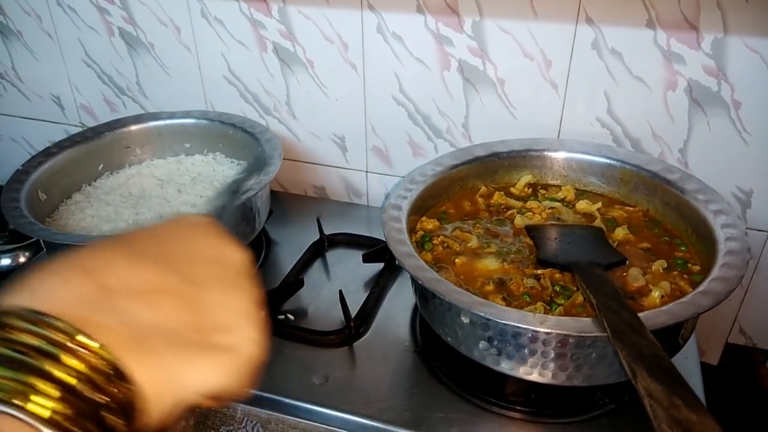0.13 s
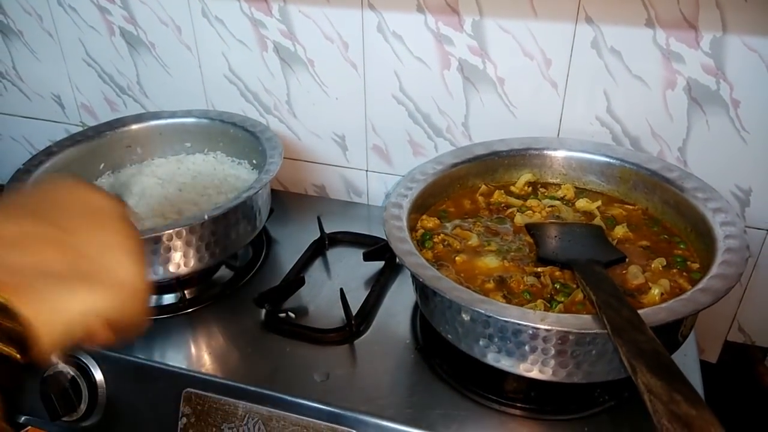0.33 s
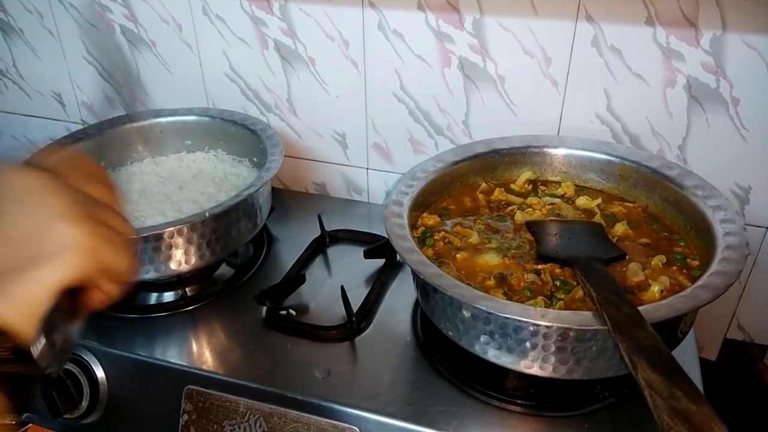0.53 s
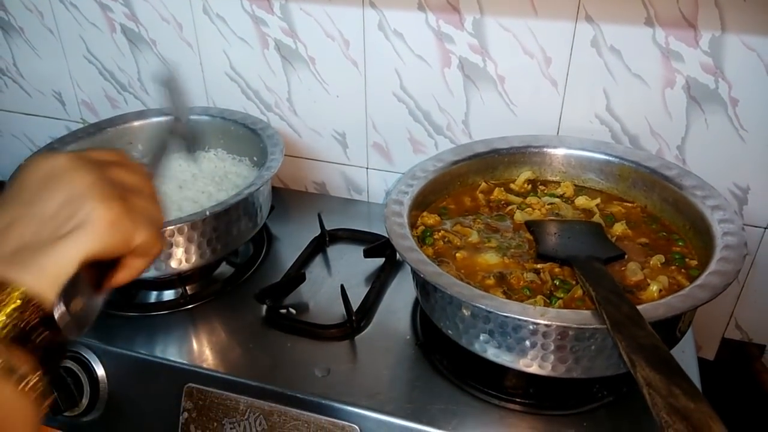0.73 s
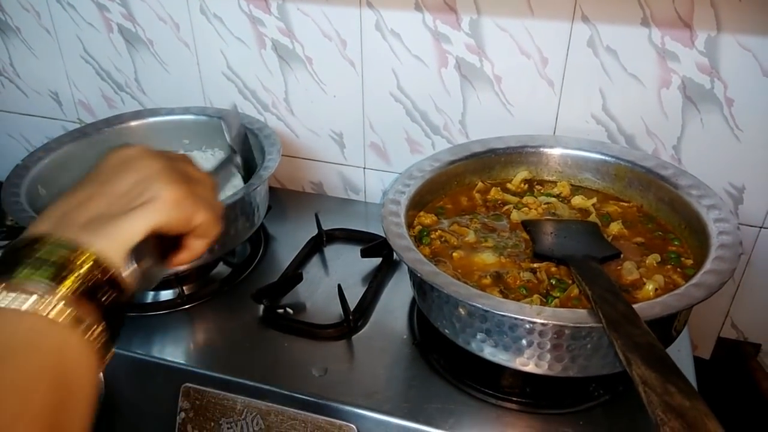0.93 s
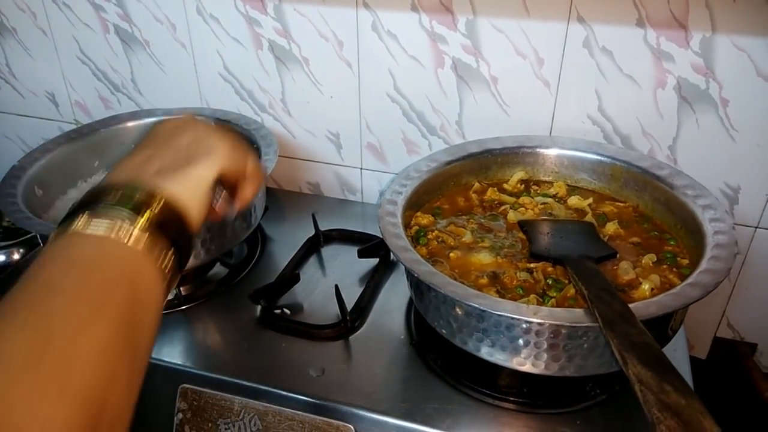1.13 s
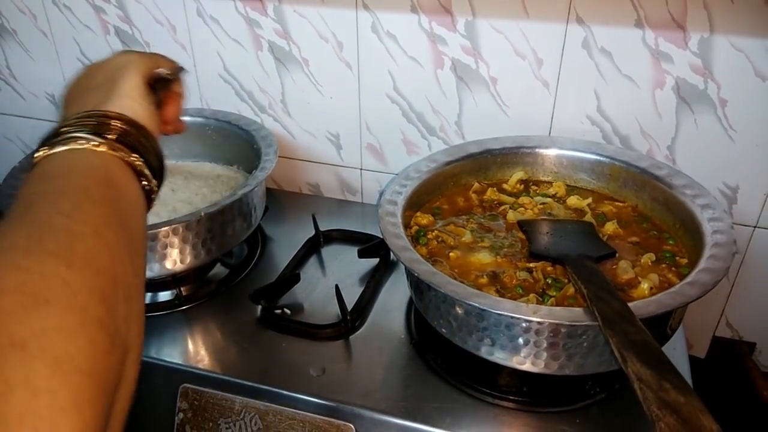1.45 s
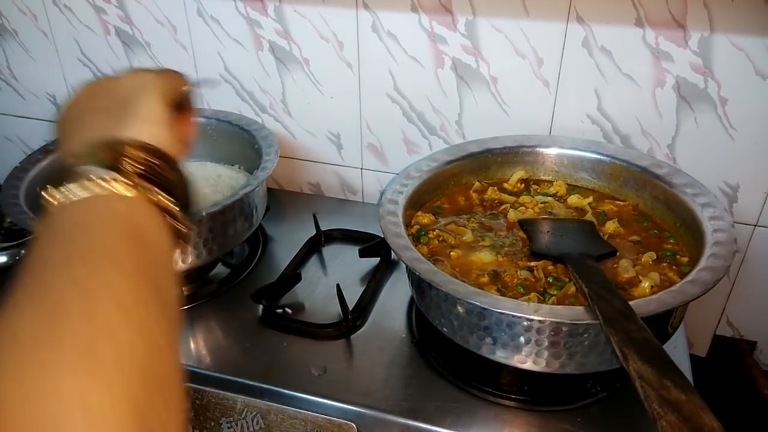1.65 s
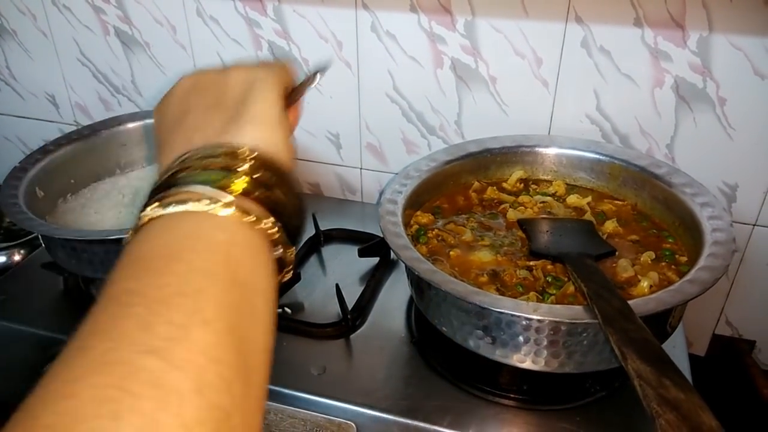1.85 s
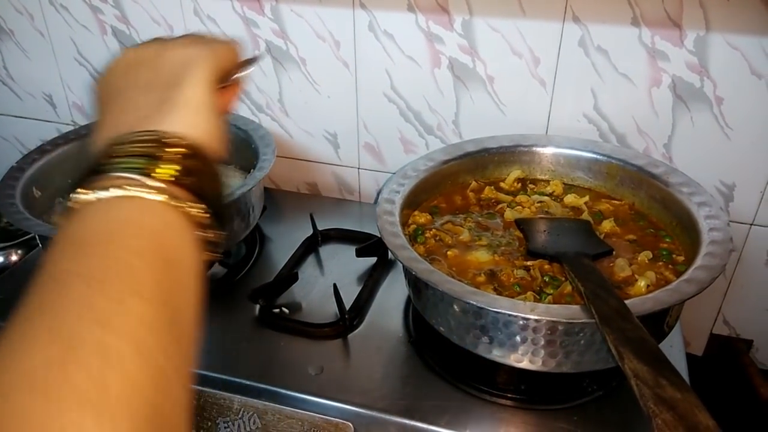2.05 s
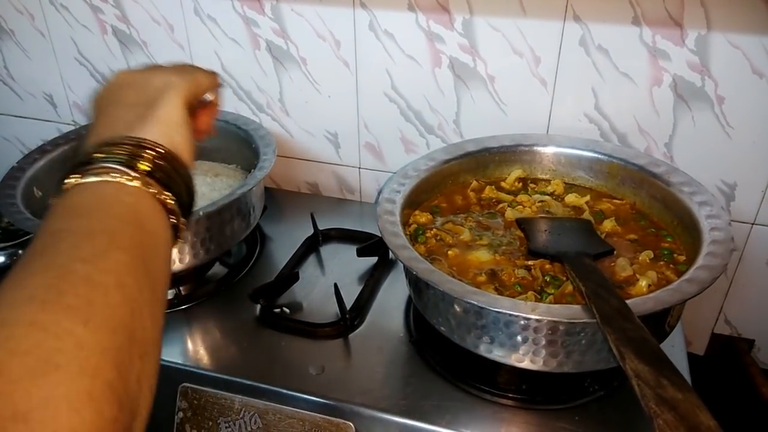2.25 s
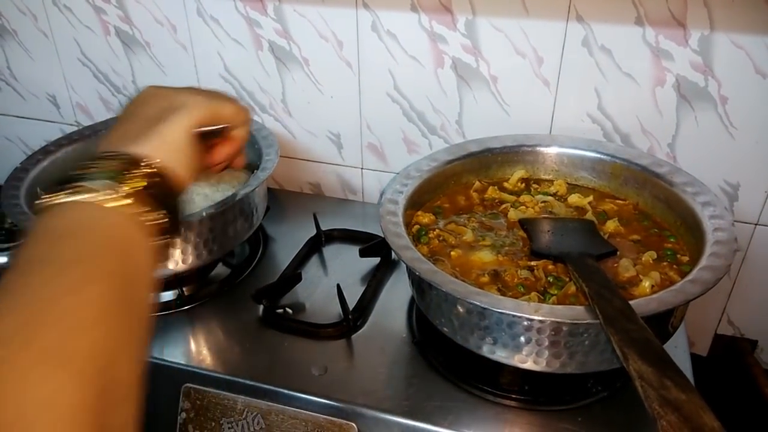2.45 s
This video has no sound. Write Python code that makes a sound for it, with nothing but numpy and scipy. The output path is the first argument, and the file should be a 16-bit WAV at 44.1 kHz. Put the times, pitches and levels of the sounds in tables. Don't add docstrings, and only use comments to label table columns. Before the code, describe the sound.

A metal spoon knocks and scrapes against a thin steel pot of rice in a tiled kitchen.

```python
import sys
import numpy as np
from scipy import signal
from scipy.fft import rfft, irfft
from scipy.io import wavfile
from scipy.ndimage import uniform_filter1d, minimum_filter1d

SR = 44100
rng = np.random.default_rng(int(sys.argv[2]) if len(sys.argv) > 2 else 0)


def materialize(psi):
    bounded = np.clip(np.atleast_2d(psi).T, -1, 1)
    quanta = np.round(bounded * 32767).astype(np.int16)
    wavfile.write(sys.argv[1], SR, quanta)


def nominal_scale(level):
    x = np.asarray(level, float) / 20
    return 10 ** x


N = 114660


def evened(x):
    return x / np.sqrt(np.mean(x ** 2) + 1e-20)


def read(points, hz):
    f, value = np.transpose(points)
    return np.interp(np.log(hz + 1), np.log(f + 1), value)


def band(x, order, lo_hz, hi_hz):
    return signal.sosfilt(signal.butter(order, [lo_hz, hi_hz], "band", fs=SR, output="sos"), x)


def alike(draw, same):
    return np.array([same * draw[1] + np.sqrt(1 - same ** 2) * draw[0], draw[1]])


def modes(table, flip=1, spread=0.6):
    t = np.arange(SR // 3) / SR
    hz, db, t60 = np.transpose(table)[..., None, None]
    phase = spread * rng.standard_normal(hz.shape) * [[1], [0]]
    sign = flip ** np.arange(len(table))[:, None, None]
    out = sign * nominal_scale(db - 60 * t / t60) * np.sin(2 * np.pi * hz * t + phase)
    return out / np.linalg.norm(out[:, 1])


def tail(t60s, colour, lo_hz, hi_hz, same):
    noise = alike(rng.standard_normal((2, SR // 2)), same)
    hz, t, z = signal.stft(noise, SR, nperseg=128)
    z = z * nominal_scale(read(colour, hz)[:, None] - 60 * t / read(t60s, hz)[:, None])
    out = band(signal.istft(z, SR, nperseg=128)[1], 2, lo_hz, hi_hz)
    return out / np.linalg.norm(out[1])


def through(drive, ring):
    return signal.fftconvolve(np.atleast_2d(drive), ring, axes=1)[:, :N]


def lean(x, table):
    lag_samples, lag_from_hz = 12, 2040
    hz = np.fft.rfftfreq(N, 1 / SR)
    z = rfft(x) * nominal_scale(np.outer([.5, -.5], read(table, hz)))
    lag_s = lag_samples / SR / (1 + (lag_from_hz / (hz + 1)) ** 4)
    z[0] *= np.exp(-2j * np.pi * hz * lag_s)
    return irfft(z, N)


# frequency in Hz, density in dB per Hz.
HISS = [(24, -81), (60, -31), (120, -4), (249, -2), (896, -8.5), (1090, -12), (2050, -5.5), (2440, -7.5),
        (11000, -6.5), (16000, -30)]
# frequency in Hz, left minus right in dB.
HISS_LEAN = [(200, -2), (900, 4), (2400, -23), (8000, -17.5), (15000, -30)]
# frequency in Hz, left-right likeness from 0 to 1.
HISS_SAME = [(200, 1), (1400, 0.34), (6000, 0)]
# time in seconds, level in dB.
FLAME = [
    (0.0, -50),
    (1.0, -54.5),
    (2.6, -51.5),
]


def stove():
    level_db, patch_db = -57.5, 2.2
    frames, hz = N // 128 + 5, np.fft.rfftfreq(512, 1 / SR)
    a, b, c, d, patches = rng.standard_normal((frames, 257, 5)).T
    patches = evened(uniform_filter1d(uniform_filter1d(patches, 6, 0), 20, 1))
    z = alike([c + 1j * d, a + 1j * b], read(HISS_SAME, hz)[:, None])[::-1]
    s, db = np.transpose(FLAME)
    swell = np.interp(np.arange(frames) * 128 / SR, s, db - db.mean())
    z = z * nominal_scale(read(HISS, hz)[:, None] + patch_db * patches + 0.23 * swell)
    out = lean(signal.istft(z, nperseg=512, noverlap=384)[1][:, :N], HISS_LEAN)
    return nominal_scale(level_db) * out / np.std(out.mean(0))


# frequency in Hz, t60 in seconds.
ROOM = [(300, 0.22), (2000, 0.28), (6000, 0.23), (14000, 0.067)]


def tile_echo(near):
    room = tail(ROOM, [(100, -1.5), (16000, -9.5)], 120, 13000, 0.078)
    return nominal_scale(-6) * through(near[1], np.pad(room, ((0, 0), (200, 0))))


# frequency in Hz, density in dB per Hz.
GRIT = [(88, -66.5), (150, -32.5), (1260, -13.5), (1480, -20), (2180, -8.5), (2400, -12.5), (4240, -19),
        (10200, -26.5), (16000, -31)]
# frequency in Hz, t60 in seconds.
GRIT_T60 = [(300, 0.083), (3000, 0.13), (14000, 0.021)]


def grit(lo_hz, hi_hz, same):
    return tail(GRIT_T60, GRIT, lo_hz, hi_hz, same)


# start in seconds, level in dB.
BANGLES = [
    (0.05, -55),
    (0.153, -46),
    (0.1643, -49.5),
    (0.1716, -55),
]
# frequency in Hz, level in dB, t60 in seconds.
GLASS = [(9060, 25, 0.045), (10700, -5, 0.023), (12400, 4, 0.037), (14100, -6, .02)]
# frequency in Hz, level in dB, t60 in seconds.
OLD_RING = (994, -63.5, 0.55)


def bangles():
    drive, t = np.zeros(N), np.arange(N) / SR
    for s, db in BANGLES:
        drive[round(s * SR):][:60] += nominal_scale(db + 6.5) * rng.standard_normal(60)
    glass = modes(GLASS).sum(0) + 0.95 * grit(10600, 14700, 0.54)[:, :SR // 3]
    hz, db, t60 = OLD_RING
    fading = nominal_scale(db - 60 * t / t60) * rng.standard_normal(N)
    old = through(fading, modes([(hz, 0, .05), (hz * 0.934, -6, .05)]).sum(0))
    return through(drive, glass) + old


# start in seconds, length in seconds, frequency in Hz,
# glide in Hz, level in dB.
GROANS = [(.49, 0.069, 239, -8, -52.5), (0.493, 0.052, 387, -17, -57), (0.498, 0.034, 2392, 3, -34.5),
          (0.719, 0.052, 833, 0, -40), (0.761, .1, 405.5, 56, -52), (0.859, 0.13, 440.3, -50, -48),
          (0.786, 0.0464, 3653, 3, -37), (.77, 0.09, 1060, -7, -46), (.89, 0.11, 790, -8, -42),
          (.9, 0.045, 1780, -11, -37.5), (0.946, 0.13, 305, 30, -51.5), (.96, 0.045, 178, 0, -59),
          (.95, 0.053, 504.6, 0, -50), (1.001, 0.058, 630, 2, -45), (1.062, 0.064, 765, 1.5, -47.5),
          (1.33, 0.024, 508, 0, -39.5), (1.374, 0.09, 463.3, -13, -52.5), (2.266, 0.032, 8400, 6.5, -37.5),
          (2.28, .05, 9670, 0, -35.5), (2.35, 0.033, 9950, 2, -45.5), (2.278, 0.041, 700, 9, -51.5)]


def groans():
    out = np.zeros(N)
    for s, length, hz, glide_hz, db in GROANS:
        noise, n = rng.standard_normal((2, SR // 4)), round(length * SR)
        width_hz = 30.5 + 0.017 * hz
        lowpass = signal.butter(2, width_hz / 2, fs=SR, output="sos")
        slow = signal.sosfilt(lowpass, 0.011 + noise[0] + 1j * noise[1])[-n:]
        phase = 2 * np.pi * np.cumsum(hz + glide_hz * np.linspace(-.5, .5, n)) / SR
        squeak = evened((slow * np.exp(1j * phase)).real) * np.hanning(n) ** .5
        out[round(s * SR):][:n] += nominal_scale(db) * squeak
    return out


# start in seconds, level in dB.
PUFFS = [
    (0.491, -75),
    (.6, -72),
    (0.959, -74),
    (1.325, -65.5),
    (1.946, -70.5),
    (2.031, -67),
    (2.075, -68),
    (2.131, -65),
]


def jolts():
    out, t = np.zeros(N), np.arange(SR // 8) / SR
    jolt = np.sin(2 * np.pi * 35 * t) * np.exp(-t / .02)
    for s, db in PUFFS:
        out[round(s * SR):][:len(t)] += nominal_scale(db + 18) * jolt
    return out


# start in seconds, then levels of wall, pair, spoon and belly in dB.
KNOCKS = [(0.4858, -25, -32.5, -22, -80), (0.5996, -24, -35, -27, -88), (0.6988, -28, -27.5, -43, -81),
          (0.7258, -36.5, -62, -33.5, -61), (0.7876, -30.5, -49, -30, -64), (0.957, -35.5, -22.5, -22, -51),
          (1.1877, -39.5, -36, -38.5, -58.5), (1.2336, -46.5, -39.5, -39.5, -60),
          (1.2513, -34, -30.5, -38, -56), (1.3219, -15, -14, -26.5, -31.5), (1.3326, -18, -29, -35.5, -56),
          (1.9419, -22.5, -12, -18.5, -23), (2.0306, -35.5, -18.5, -28.5, -27),
          (2.0536, -29, -17, -36.5, -24.5), (2.0731, -33, -24, -29, -39), (2.1244, -17, -47, -34, -34),
          (2.1314, -13, -17, -22.5, -27), (2.2471, -32, -60, -34, -51), (2.277, -53.5, -61, -35, -65.5)]


def knocks(column, shape, spot_db=0):
    out, spot = np.zeros((2, N)), nominal_scale(spot_db * rng.standard_normal(60))
    for k, row in enumerate(KNOCKS):
        at = round(row[0] * SR)
        contact = shape[:, k] / np.linalg.norm(shape[1, k])
        out[:, at:at + shape.shape[2]] += spot[k] * nominal_scale(row[column]) * contact
    return out


def thud(chatter):
    return band(nominal_scale(20.5) * knocks(4, chatter), 2, 150, 300)


# time in seconds, pressure in dB, speed in dB, grip on the wall in dB.
STROKES = [
    [(.61, -44, 8.5, -2), (.68, -41, 5, -5), (.74, -33.5, -9.5, -1.5), (.775, -54, 31, 30)],
    [(.79, -29, -6, -33), (.9, -32, -3, -18.5), (.965, -30.5, 3.5, 4), (1.04, -35.5, 3, -6.5),
     (1.11, -47.5, 1.5, 7), (1.18, -42, 2.5, 7.5), (1.24, -42.5, 5.5, 11), (1.305, -63.5, 16, 19)],
    [(1.35, -46.5, -16.5, -2), (1.41, -37.5, -4.5, 6), (1.46, -57.5, 4, -5)],
    [(1.97, -36.5, -7, 13.5), (2.06, -47, 10.5, 10.5), (2.12, -58.5, 5, 7)],
    [(2.16, -30, -4, 5), (2.22, -43.5, 2, -30), (2.28, -40.5, 10, -14), (2.35, -40.5, 4.5, -18),
     (2.385, -76, 22, 15)],
]


def stroke(weights):
    lift_s = 0.0061
    t, power = np.arange(N) / SR, np.zeros(N)
    for rows in STROKES:
        s, *controls = np.transpose(rows)
        ends = np.clip(np.minimum(t - s[0], s[-1] - t) / lift_s + .5, 0, 1)
        power += (ends ** .5 * nominal_scale(np.interp(t, s, np.dot(weights, controls)))) ** 2
    return np.sqrt(power)


def wander():
    depth_db, points_per_s = 6, 100
    steps = rng.standard_normal(round(N / SR * points_per_s) + 2)
    slow = evened(uniform_filter1d(steps, 4))
    return nominal_scale(depth_db * np.interp(np.arange(N) / SR * points_per_s, np.arange(len(slow)), slow))


CONTACT = {"pair": (2, (0.63, 0, 0.68)), "wall": (1, (0.89, 0, 0.25)),
           "spoon": (3, (0.97, 0.56, 0)), "belly": (4, (1, -0.38, 0.44))}
# frequency in Hz, level in dB, t60 in seconds.
PAIR = [(1487.1, 0, 0.081), (1505.2, 0.5, .08)]
WALL_HZ = [1572, 1904, 2427, 2460, 2956, 3274, 3342, 3414, 3644, 3745, 4060, 4545, 5110, 5600]
# level in dB, t60 in seconds.
WALL = [(-9, .08), (-8, .12), (-1, .16), (-6, .09), (-4, .15), (-8, .15), (-7, .17), (-6, .17), (-8, .13),
        (-10, .1), (-8, .15), (-5, .1), (-5, .1), (-9, .1)]
# frequency in Hz, level in dB, t60 in seconds.
SPOON = [(5850, -4, .05), (7380, -5, .05), (7810, -4, .05), (8400, -4, .05), (8900, -4, .04),
         (9930, -2, .04), (10900, -4, .04), (12050, -7, .04)]
# frequency in Hz, level in dB, t60 in seconds.
BELLY = [(552, 7, 0.054), (715, 4.5, 0.08), (780, 15.5, 0.037), (1060, 5.5, 0.03)]
RING_DB = (-1.5, -8, -11, -7)
SING_DB = (-17, -14, -22, -17)


def ringing(chatter, slips):
    rings = {"pair": modes(PAIR, -0.94, 0).sum(0)[None], "wall": modes(np.column_stack([WALL_HZ, WALL])),
             "spoon": modes(SPOON), "belly": modes(BELLY)}
    out = 0
    for (part, (column, weights)), ring_db, sing_db in zip(CONTACT.items(), RING_DB, SING_DB):
        shape, spot_db = (chatter[..., :1], 0) if part == "pair" else (chatter, 4)
        rub = nominal_scale(sing_db) * stroke(weights) * slips
        for ring in rings[part]:
            hit = 30 * nominal_scale(ring_db) * knocks(column, shape, spot_db)
            out = out + through(hit + rub * wander(), ring)
    return out


CRACK_DB = (-4.5, -8.5, 0.5)
RUB_DB = (-7, -7.5, -3)
# centre in Hz, width in Hz.
GAPS = [(2190, 250), (2720, 120), (4230, 300), (4880, 200), (6150, 150)]


def dense_modes(chatter, slips):
    bands = [("belly", 400, 1300), ("wall", 1300, 6000), ("spoon", 6000, 17000)]
    dense = 0
    for (part, lo_hz, hi_hz), crack_db, rub_db in zip(bands, CRACK_DB, RUB_DB):
        column, weights = CONTACT[part]
        crack = 20 * nominal_scale(crack_db) * knocks(column, chatter)
        rub = nominal_scale(rub_db) * stroke(weights) * slips
        dense = dense + through(crack + rub, grit(lo_hz, hi_hz, 0.27))
    for hz, width_hz in GAPS:
        notched = signal.lfilter(*signal.iirnotch(hz, hz / width_hz, SR), dense)
        dense = dense + 0.6 * (notched - dense)
    return dense


def pot():
    likeness, contact_s = 0.38, 0.0048
    slips_per_s, slip_db = 9000, 1.8
    decay = np.exp(-np.arange(400) / SR / contact_s)
    chatter = alike(rng.standard_normal((2, len(KNOCKS), 400)) * decay * 0.052, likeness)
    chatter[..., 0] = 0.44
    size = nominal_scale(slip_db * np.minimum(rng.exponential(1, N), 5)) * (rng.random(N) < slips_per_s / SR)
    slips = alike(evened((size + 0.069) * rng.standard_normal((2, N))), likeness)
    steel = ringing(chatter, slips) + dense_modes(chatter, slips)
    steel = signal.sosfilt(signal.butter(3, 450, "high", fs=SR, output="sos"), steel)
    return steel + groans() + jolts() + thud(chatter)


# frequency in Hz, left minus right in dB.
LEAN = [(200, -3.5), (600, 1.5), (1500, -4), (4400, 0.5), (9500, -11.5), (14000, -9.5)]


def scene():
    near = pot() + bangles()
    return lean(near + tile_echo(near), LEAN) + stove()


def band_limit(x):
    return signal.sosfilt(signal.butter(12, 16800, fs=SR, output="sos"), x)


def record(dry):
    gate_db, shut_db = -4, -22
    cut = signal.sosfilt(signal.butter(1, 80, "high", fs=SR, output="sos"), dry)
    cut = signal.sosfilt(signal.cheby2(8, 30, 16400, fs=SR, output="sos"), cut)
    hz, _, z = signal.stft(cut, SR, nperseg=2048, noverlap=1536)
    raw = (abs(z) ** 2).sum(0)
    power, treble = uniform_filter1d(raw, size=5, axis=1), raw[hz > 3000].sum(0)
    calm = minimum_filter1d(treble < 3 * np.roll(treble, 2), size=3)
    around = uniform_filter1d(power, size=50, axis=0)
    under = uniform_filter1d(power, size=6, axis=0) < nominal_scale(2 * gate_db) * around
    shut = under & (hz[:, None] > 1800) & calm
    gated = signal.istft(z * nominal_scale(shut_db * shut), SR, nperseg=2048, noverlap=1536)[1][:, :N]
    return band_limit(gated)


dry = scene()
out = record(dry)
materialize(out)
```